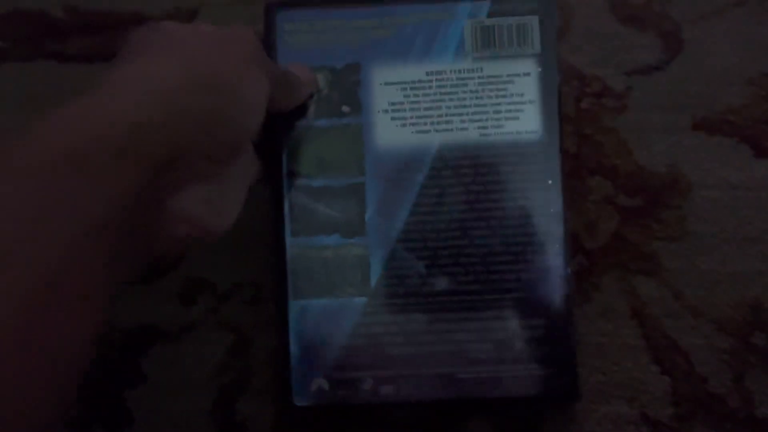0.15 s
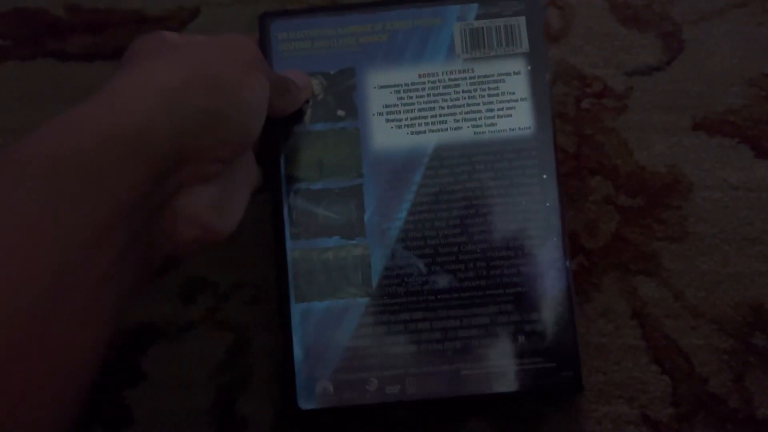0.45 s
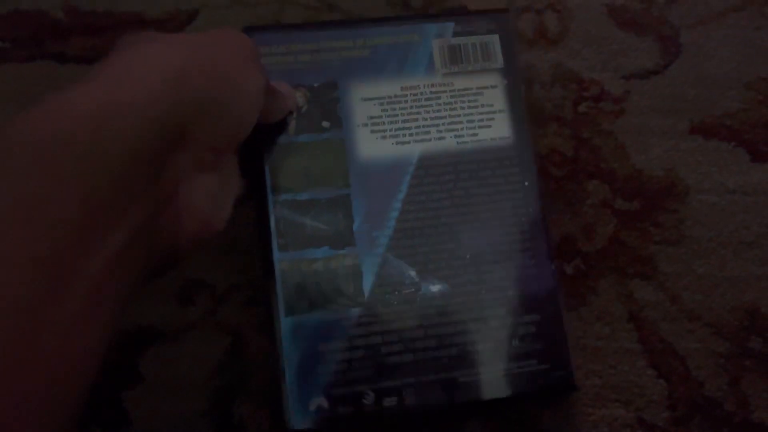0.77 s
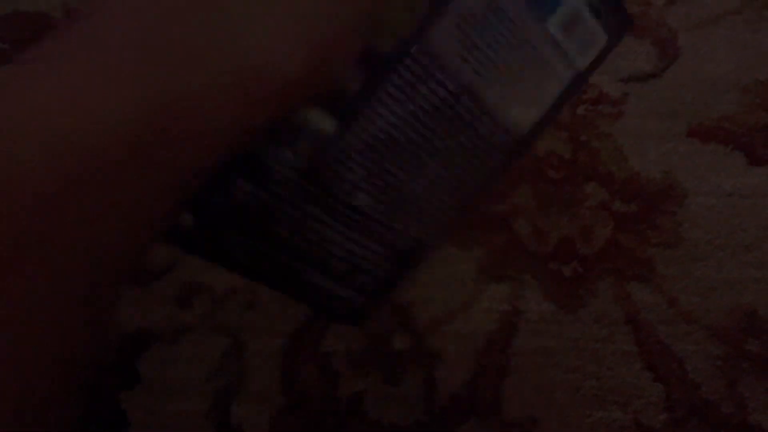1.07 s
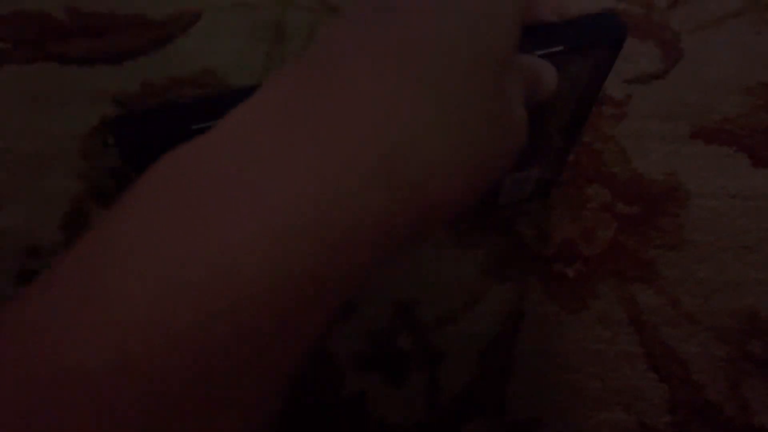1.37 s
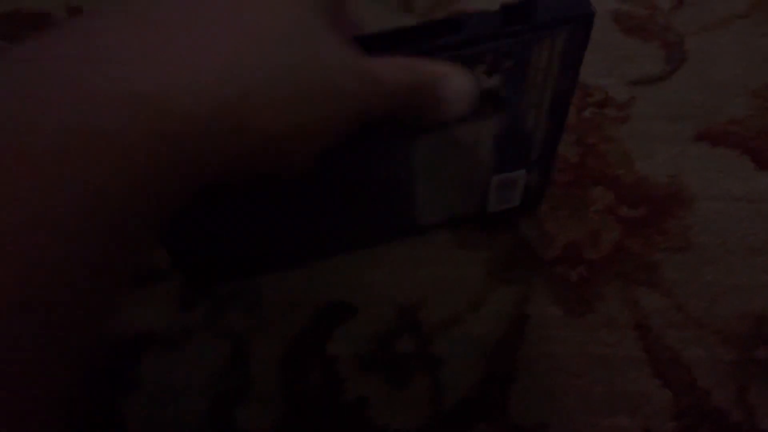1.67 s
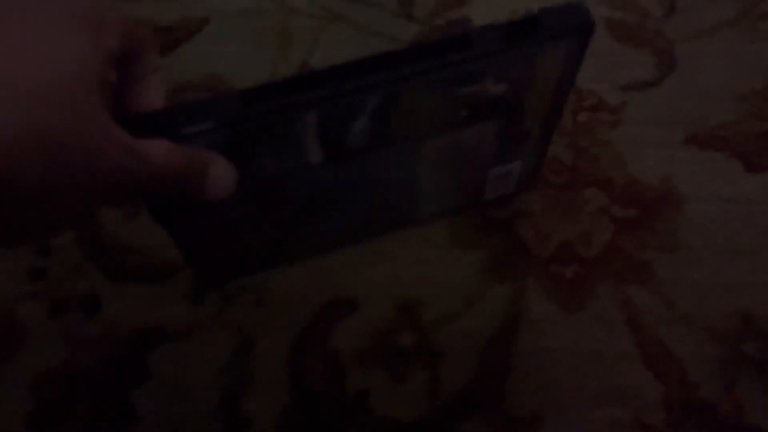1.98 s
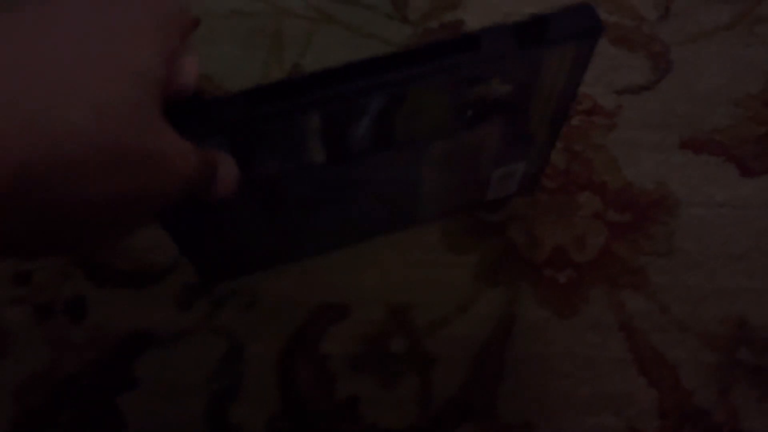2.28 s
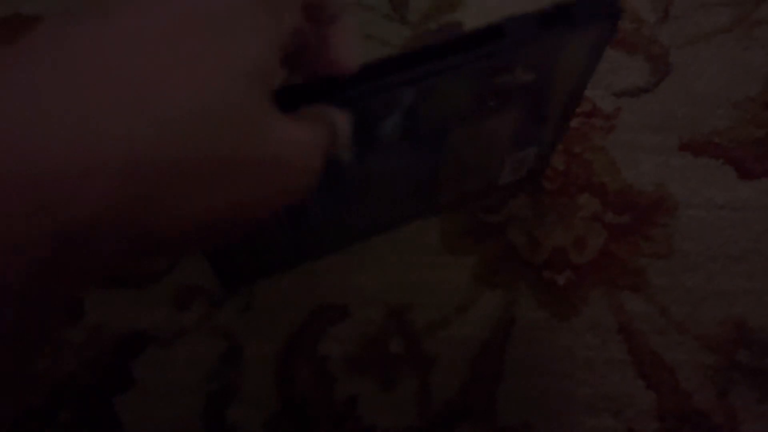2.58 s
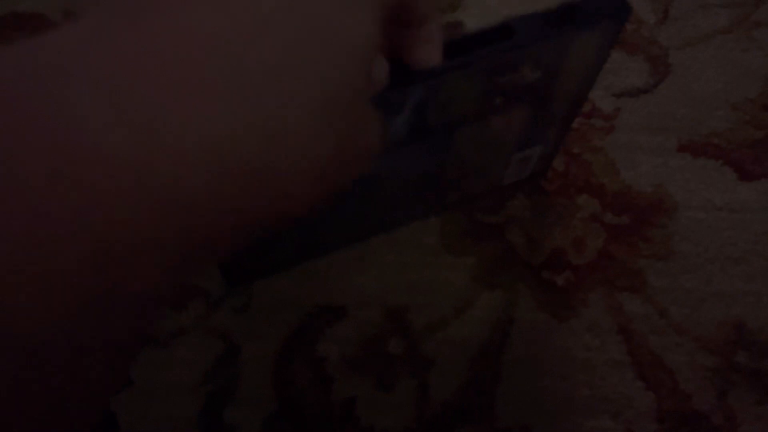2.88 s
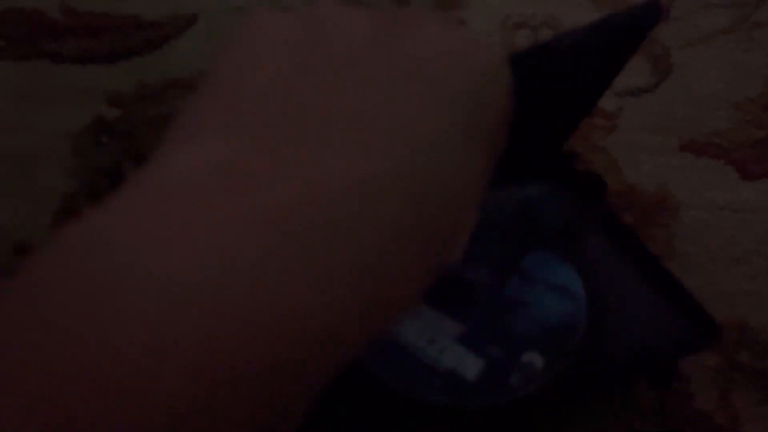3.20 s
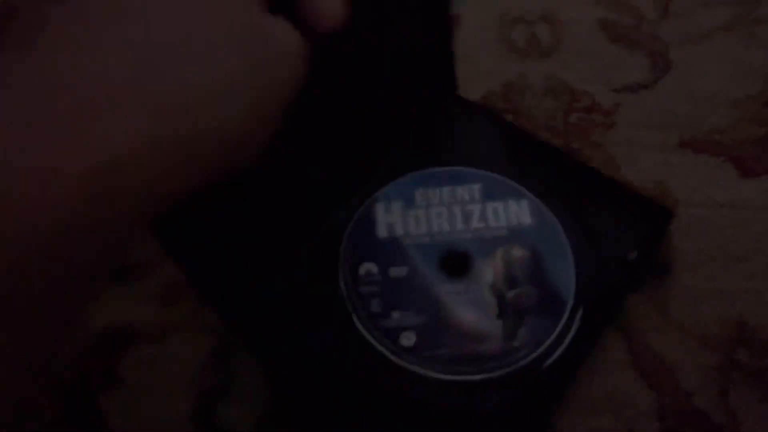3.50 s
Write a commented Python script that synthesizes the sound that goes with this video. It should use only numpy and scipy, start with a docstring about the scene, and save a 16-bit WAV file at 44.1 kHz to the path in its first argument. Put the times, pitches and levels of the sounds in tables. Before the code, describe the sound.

A hollow plastic disc case is turned in the hands with light ticks, then pried open in several bursts of creaks and sharp snaps. Soft knocks and finger rubs come between, close to the microphone in a quiet room.

```python
"""Prying open a disc case

A hollow plastic case is turned in the hands and pried open over a rug, close to a stereo microphone.
Bursts of tiny slips ring its body, shell and ribs: ticks, creaks, snaps and the crack of the latches.
Case and wrist knock, fingers rub the sleeve; a quiet room rumbles and rings on."""
import sys
import numpy as np
from scipy import signal
from scipy.fft import rfft, irfft
from scipy.io import wavfile
from scipy.ndimage import uniform_filter1d

SR = 44100
rng = np.random.default_rng(int(sys.argv[2]) if len(sys.argv) > 2 else 0)


def put_to_file(sound):
    """Save the sound as 16-bit audio at rate SR, in the file named by the first command-line argument."""
    columns = np.atleast_2d(sound).T  # one column per channel
    safe = np.clip(columns, -1, 1)
    whole_steps = np.round(safe * 32767)
    wavfile.write(sys.argv[1], SR, whole_steps.astype(np.int16))


N = 160965


def case_clicks():
    """Slips ring body, shell, ribs and a bright crack. Returns left, right and room feed."""
    # Each row: start in seconds, body level in dB, favoured body pitch in Hz, shell, rib and crack levels
    # in dB, left lag in ms, left over right in dB (limited below), slip length in ms,
    # then any pitches that ring out in Hz.
    clicks = [(0.108, -44, 300, -51, -55, -78, -0.0044, -4, 6),
              (0.1168, -41, 620, -46, -39.5, -63, -0.2, -4.5, 2.1, 4100),
              (0.1406, -47, 700.0, -50, -47, -63, -0.17, -1.5, 2.5, 4200),
              (0.3352, -91, 310.0, -84, -66.5, -66, 0.0, -4, 1.9),
              (0.8973, -68.5, 351, -80, -65, -87, -0.09, 8, 2.9),
              (0.992, -48, 930, -42.5, -45.5, -60, -0.18, -4, 5.9),
              (1.0255, -40.5, 398, -47, -53, -64, -0.23, -2, 1.76),
              (1.034, -43, 424, -52, -56, -80, 0.11, -11, 1.2),
              (1.1561, -80.5, 420.0, -55, -54.5, -75, -0.084, -5, 2.5),
              (1.2036, -37, 392, -46, -47.5, -58, -0.16, -4.5, 5.9),
              (1.233, -47.5, 520.0, -59, -59.5, -62, 0.007, -2.5, 5),
              (1.237, -34, 590, -47, -37, -51, 0.021, 6, 2.8),
              (1.2413, -29.5, 510.0, -37.5, -34.5, -56, -0.092, -7, 3.1),
              (1.247, -33.5, 630.0, -46, -38, -54, -0.31, 22, 7.6),
              (1.25, -26.5, 720, -32.5, -33, -47, 0.0056, -6, 1.5),
              (1.2518, -30, 760.0, -45, -30, -63, 0.13, -7, 4.5),
              (1.259, -43.5, 672, -40, -43.5, -55, 0.24, -16, 2.0),
              (1.412, -27, 820, -30, -34, -61, -0.15, -4, 0.88, 1850),
              (1.4159, -28, 260, -44, -37.5, -80, -0.15, 8, 4.9),
              (1.4222, -24.5, 565, -29, -18, -19, 0.1, -2, 2.2, 2700, 4500),
              (1.534, -44, 300.0, -44, -60.5, -63, 0.12, -13, 3),
              (1.588, -53, 320.0, -60.5, -61.5, -73, -0.17, 5, 2.0),
              (1.622, -48.5, 587, -58.5, -55.5, -65, -0.093, -4, 1.74),
              (1.629, -47, 382, -54.5, -48, -54, -0.13, -2, 11),
              (1.815, -42, 583, -41, -42, -58, -0.22, -3.5, 6),
              (1.885, -52, 440.0, -66, -58, -61, -0.21, -3, 1.8),
              (1.9377, -50.5, 493, -47, -51, -71, -0.16, -7.5, 0.88),
              (2.081, -56, 400.0, -63, -65, -86, -0.34, -7.5, 1.78),
              (2.159, -56, 439, -58.5, -66, -79, 0.062, -5, 2.0),
              (2.21, -50.5, 524, -45.5, -59, -78, -0.26, -1.5, 4.3),
              (2.232, -42, 330.0, -47, -54.5, -74.5, -0.18, -6.5, 0.91),
              (2.2465, -33, 260, -34, -19, -40, -0.08, -3, 3, 3150),
              (2.2492, -25, 820, -30, -23, -30, -0.13, -4.5, 0.69, 3150, 2300),
              (2.272, -36, 420, -34, -33, -52, -0.21, -6, 1.5, 1520, 3100),
              (2.2967, -31, 800, -28, -22.5, -18.5, 0.1, -1.5, 0.7, 2350, 4220),
              (2.308, -31.5, 290.0, -33, -27, -59, -0.18, -1, 1.6),
              (2.443, -46.5, 320.0, -57, -61.5, -71, -0.28, -13, 2.0),
              (2.513, -52, 390.0, -58, -55.5, -53.5, 0.24, -0.5, 1.3),
              (2.584, -42, 470.0, -62, -40, -71.5, -0.27, -6, 11),
              (2.593, -40.5, 700, -36.5, -41, -62, -0.18, -5, 2.6, 1800, 3250),
              (2.601, -37.5, 310.0, -52, -50.5, -53, -0.18, 10, 8.8),
              (2.61, -51, 440.0, -57, -44.5, -49.5, -0.31, -4, 9.4),
              (2.618, -40, 730, -40, -48.5, -62, -0.11, -2, 3, 2000),
              (2.682, -42, 350.0, -43.5, -46, -63, -0.19, -5.5, 1.96),
              (2.759, -40.5, 800, -46.5, -42, -65.5, 0.01, -9.5, 3, 4300),
              (2.8225, -51, 800, -62.5, -62.5, -90, 0.0, -5, 3.4),
              (2.834, -61.5, 610.0, -49.5, -52.5, -76, -0.2, -4, 4),
              (2.852, -47.5, 380.0, -53, -50, -53.5, -0.17, -5.5, 11.1),
              (2.917, -41.5, 610.0, -41, -38, -44, -0.16, -1, 11),
              (2.929, -34.5, 800, -41.5, -39, -46.5, 0.016, -3, 1.07, 3350, 4050),
              (2.946, -44, 432, -52.5, -41.5, -57, -0.25, 3, 11),
              (2.962, -33, 780, -33.5, -36, -63, -0.18, -11, 2.5, 2020, 3450),
              (3.091, -50, 600, -40, -38, -60, -0.1, -4, 7, 3200, 2250),
              (3.0985, -21, 730, -26, -17, -47, -0.19, -8, 0.9, 4500),
              (3.101, -30, 476, -28, -29, -34, -0.083, -4, 2),
              (3.1032, -19, 460, -19, -22, -31, -0.056, 0, 0.8, 1900, 3900),
              (3.156, -42, 410.0, -54, -53, -51.5, -0.5, -1, 3.8),
              (3.282, -45, 600, -30, -29, -55, 0.5, -2, 9, 2650, 4500),
              (3.29, -21, 580, -18, -12, -19, 0.75, -3.5, 1.1, 2650, 4550),
              (3.292, -26, 590, -26, -22, -27.5, 0.55, 1, 3.5, 3350),
              (3.303, -35, 610.0, -26, -21, -36, 0.49, -5, 5, 4550),
              (3.309, -30, 590, -27, -21, -35, 0.06, -1, 8, 3300),
              (3.501, -52, 280.0, -55, -60, -71, -0.13, -1, 1.7)]
    # Modes of the case. Each row: frequency in Hz, relative level in dB, T60 in seconds.
    body_modes = [(255, -2.5, 0.03), (360, -7, 0.025), (450, -2.5, 0.018), (590, -1.5, 0.016),
                  (720, -1.5, 0.016), (835, 1, 0.016), (1010, -8, 0.018)]
    shell_modes = [(1490, -2, 0.012), (1800, 1, 0.012), (2020, 1.5, 0.012), (2300, 1, 0.012),
                   (2660, 1, 0.01)]
    rib_modes = [(3150, 1, 0.008), (3400, -1, 0.006), (3950, 0, 0.006), (4250, 0, 0.005),
                 (4580, 0.5, 0.005), (5250, -2, 0.004), (6350, -7, 0.004)]
    crack_modes = [(7060, 6, 0.001), (9050, -3, 0.004), (10520, 3.5, 0.0023), (11650, 5, 0.003),
                   (13100, 6, 0.002), (14300, 4, 0.0025)]
    body_hz, crack_hz = np.transpose(body_modes)[0], np.transpose(crack_modes)[0]
    out = np.zeros((3, N))
    for (start_s, body_db, favoured_hz, shell_db, ribs_db, crack_db,
         lag_ms, pan_db, slip_ms, *ringing_hz) in clicks:
        slip = slip_burst(slip_ms / 1000)
        snap = slip_burst(0.4 * slip_ms / 1000)
        body = shift_levels(body_modes, -14 * abs(np.log2(body_hz / favoured_hz)))
        tilt_db_per_octave = 0.6 * np.clip(crack_db - ribs_db + 8, 0, 20)
        crack = shift_levels(crack_modes, tilt_db_per_octave * np.log2(crack_hz / crack_hz[0]))
        high = (ring_modes(boost_near(shell_modes, ringing_hz), slip, shell_db)
                + ring_modes(boost_near(rib_modes, ringing_hz), slip, ribs_db)
                + ring_modes(crack, snap, crack_db))
        high *= gain_of(np.clip(pan_db, -9, 6) * np.array([[0.5], [-0.5], [0]]))
        low = ring_modes(body, slip, body_db, listener_spread_db=0)
        for channel, lag_s in enumerate((lag_ms / 1000, 0, 0)):
            add(out[channel], start_s + lag_s, high[channel])
            # The broad body reaches both sides more nearly together.
            add(out[channel], start_s + 0.35 * lag_s, low[channel])
    return out


def slip_burst(length_s):
    """A rush of tiny slips that swells and dies, with a near-flat spectrum."""
    progress = np.arange(1536) / SR / length_s
    envelope = progress ** 1.2 * np.exp(-2.2 * progress)
    slips = rng.standard_normal(len(progress))
    for _ in range(4):  # soften peaks, then whiten
        spectrum = rfft(np.sign(slips) * np.sqrt(abs(slips)) * envelope)
        slips = irfft(spectrum / (abs(spectrum) + 1e-12)) / (envelope + 0.02 * envelope.max())
    return slips * envelope


def ring_modes(modes, slip, level_db, spot_spread_db=1.8, listener_spread_db=1.5):
    """A slip excites damped modes; strengths vary with the spot struck and over three listening points."""
    t = np.arange(2400) / SR
    hz, mode_db, t60_s = np.transpose(modes)[:, :, None]
    spot, detune, *listeners = rng.standard_normal((len(modes), 5)).T[:, :, None]
    polarity = (-1.) ** np.arange(len(modes))[:, None]
    decay = gain_of(mode_db + spot_spread_db * spot - 60 * t / t60_s)
    tones = polarity * decay * np.sin(2 * np.pi * hz * (1 + 0.012 * detune) * t)
    responses = [(tones * gain_of(listener_spread_db * listener)).sum(0) for listener in listeners]
    rings = [signal.fftconvolve(response, slip) for response in responses]
    return np.array([gain_of(level_db) * x / np.sqrt(np.sum(x[:1200] ** 2) / 150) for x in rings])


def shift_levels(modes, shift_db):
    hz, mode_db, t60_s = np.transpose(modes)
    return np.column_stack([hz, mode_db + shift_db, t60_s])


def boost_near(modes, pitches_hz, boost_db=11, width_octaves=0.08):
    """Modes near the given pitches stand out."""
    octaves = np.log2(np.transpose(modes)[0][:, None] / np.reshape(pitches_hz, (1, -1)))
    return shift_levels(modes, boost_db * np.exp(-(octaves / width_octaves) ** 2).sum(1))


def thuds(attack_s=0.0088):
    """Low knocks of case and wrist: damped sines with a soft onset, mono."""
    # Each row: start in seconds, level in dB, frequency in Hz, T60 in seconds.
    knocks = [(.115, -17, 54.6, 0.028), (1.233, -13.5, 106.5, 0.031), (1.417, -28, 113, 0.13),
              (1.468, -22, 80.2, 0.048), (2.933, -15.5, 55.7, 0.032), (3.102, -19.5, 56.4, 0.088),
              (3.106, -24, 95, .06), (3.301, -34, 121, 0.077), (3.296, -25, 67, 0.092)]
    out, t = np.zeros(N), np.arange(SR // 4) / SR
    for start_s, level_db, hz, t60_s in knocks:
        envelope = gain_of(level_db - 60 * t / t60_s) * np.minimum(t / attack_s, 1)
        add(out, start_s, envelope * np.sin(2 * np.pi * hz * t))
    return out


def finger_rub(grits_per_s=1500, grit_spread_db=3.0, left_lead_ms=0.18):
    """Fingers slide on the sleeve: dense grit roughens a hiss and a duller scrape."""
    # Each row: time in seconds, hiss level in dB, scrape level in dB.
    levels = [(0, -85, -73), (0.1, -86, -70), (0.16, -77, -57), (0.26, -92, -82), (0.45, -95, -88),
              (0.85, -98, -85), (0.91, -86, -70), (0.97, -83, -71), (1.04, -84, -63), (1.09, -96, -81),
              (1.14, -74, -63.5), (1.19, -74.5, -60.5), (1.3, -82, -63), (1.38, -86, -70),
              (1.47, -51, -44.5), (1.54, -65.5, -59), (1.64, -70, -62.5), (1.7, -89, -73), (1.74, -96, -77),
              (1.77, -71, -66), (1.83, -73.5, -70.5), (1.9, -74, -66), (2.0, -79, -67.5),
              (2.08, -88.5, -84), (2.15, -71, -69), (2.21, -89, -64.5), (2.38, -59.5, -49),
              (2.47, -70, -58), (2.54, -90, -74), (2.58, -68, -58.5), (2.66, -69, -61.5),
              (2.74, -85.5, -71), (2.81, -85, -71.5), (2.89, -72, -62), (3.0, -79, -95), (3.07, -81, -57.5),
              (3.2, -72, -67.5), (3.27, -69.5, -45.5), (3.42, -74, -55), (3.5, -64.5, -57),
              (3.57, -73, -66), (3.65, -71, -61)]
    # Friction spectra. Each row: frequency in Hz, relative level in dB.
    hiss_spectrum = [(4000, -20.5), (6500, -5.5), (9000, -2), (12000, 1.5), (14500, -3.5), (16000, -15)]
    scrape_spectrum = [(200, -12), (500, 2), (900, 1), (2500, -0.5), (4300, 5), (5500, -8.5), (8000, -29)]
    grit = gain_of(grit_spread_db * np.minimum(rng.exponential(1, N), 5))
    grit *= rng.random(N) < grits_per_s / SR
    roughness = 1 + 1.1 * unit_rms(uniform_filter1d(grit, 40))
    noise = rng.standard_normal((3, N))
    shared = np.array([noise[2], np.roll(noise[2], round(left_lead_ms * SR / 1000))])
    friction = (noise[:2] + 1.3 * shared) * roughness
    hiss = gain_of(over_time(levels)) * unit_rms(equalise(friction, hiss_spectrum))
    scrape = gain_of(over_time(levels, column=2)) * unit_rms(equalise(friction, scrape_spectrum))
    return hiss + scrape * gain_of([[-1.5], [1.5]])


def room_reverb(feed, tail_db=-8, early_db=-7, build_s=0.012):
    """Wall and ceiling echoes over a sparse tail whose bands die at their own rates."""
    # Each row: delay in seconds, level in dB before the room's colour.
    echoes = [(.0135, -23), (.016, -24), (.022, -19), (.027, -21)]
    # Each row: frequency in Hz, T60 in seconds.
    decay_times = [(100, 0.17), (300, 0.15), (700, 0.3), (1800, 0.3), (4800, 0.28), (12000, 0.29)]
    # Each row: frequency in Hz, left-right correlation of the tail.
    correlations = [(100, .9), (600, .92), (1200, .6), (3000, 0)]
    # Each row: frequency in Hz, gain in dB.
    room_colour = [(100, 4), (500, -4), (2000, -4.5), (4500, -6), (8000, -1), (14000, -14)]
    taps = np.zeros((2, SR))
    positions = np.arange(140, SR - 20, 20) + rng.integers(0, 20, (2, (SR - 141) // 20))
    np.put_along_axis(taps, positions, rng.choice([-1., 1.], positions.shape), 1)
    taps[:, :round(build_s * SR)] *= gain_of(early_db)  # thin until the first walls answer
    hz, t, spectra = signal.stft(taps, SR, nperseg=256)
    spectra = stereo_pair(*spectra, at_hz(correlations, hz)[:, None])
    spectra *= gain_of(-60 * t / at_hz(decay_times, hz)[:, None])
    response = signal.istft(spectra, SR, nperseg=256)[1][:, :SR]
    response *= gain_of(tail_db) / np.linalg.norm(response[0])
    for delay_s, level_db in echoes:
        response[[0, 1], round(delay_s * SR) + rng.integers(0, 8, 2)] += gain_of(level_db)
    return equalise(signal.fftconvolve(feed[None], response, axes=1)[:, :N], room_colour)


def room_tone(floor_db=-56, patch_spread_db=1.6):
    """Low lumpy rumble and faint hiss, in drifting patches."""
    # Each row: frequency in Hz, relative spectral density in dB.
    spectrum = [(15, -28.5), (25, -42), (59, 6), (157, -1.5), (270, -12.5), (335, -6), (503, -14),
                (714, -26.5), (1070, -30), (1160, -25.5), (1790, -30.5), (2350, -25.5), (2910, -35),
                (16000, -69)]
    # Each row: frequency in Hz, left-right correlation.
    correlations = [(60, 0.98), (180, 0.88), (550, 0.32), (1650, -0.07), (4970, 0.05), (15000, 0.4)]
    # Each row: time in seconds, level in dB; only the rise above the lowest counts.
    drift = [(0.0, -59.5), (0.15, -59), (0.68, -59.5), (1.09, -57.5), (1.44, -58.5), (1.81, -57),
             (2.75, -56), (3.65, -59)]
    frames, hz = N // 256 + 5, np.fft.rfftfreq(1024, 1 / SR)
    left_re, left_im, other_re, other_im, patches = rng.standard_normal((frames, 513, 5)).T
    patches = unit_rms(uniform_filter1d(uniform_filter1d(patches, 6, axis=0), 10, axis=1))
    spectra = stereo_pair(left_re + 1j * left_im, other_re + 1j * other_im, at_hz(correlations, hz)[:, None])
    spectra *= gain_of(at_hz(spectrum, hz)[:, None] + patch_spread_db * patches)
    noise = unit_rms(signal.istft(spectra, nperseg=1024, noverlap=768)[1][:, :N])
    drift_db = over_time(drift)
    return gain_of(floor_db + drift_db - drift_db.min()) * noise


def gain_of(db):
    return 10 ** (np.asarray(db) / 20)


def unit_rms(x):
    return x / np.sqrt(np.mean(x ** 2) + 1e-20)


def at_hz(points, hz):
    knots_hz, values = np.transpose(points)
    return np.interp(np.log(hz + 1), np.log(knots_hz + 1), values)


def over_time(points, column=1):
    columns = np.transpose(points)
    return np.interp(np.arange(N) / SR, columns[0], columns[column])


def add(mix, start_s, sound):
    part = mix[round(start_s * SR):][:len(sound)]
    part += sound[:len(part)]


def equalise(x, points):
    hz = np.fft.rfftfreq(x.shape[-1], 1 / SR)
    return irfft(rfft(x) * gain_of(at_hz(points, hz)), x.shape[-1])


def stereo_pair(left, other, correlation):
    return np.array([left, correlation * left + np.sqrt(1 - correlation ** 2) * other])


def scene():
    """The case and its reverb, dry finger rub and room tone."""
    case = case_clicks() + thuds()
    return case[:2] + room_reverb(case[2]) + finger_rub() + room_tone()


def record(dry, cutoff_hz=16800):
    """Microphone colour, then a steep low-pass."""
    # Each row: frequency in Hz, gain in dB.
    mic_response = [(20, -22), (45, 0), (15000, 0), (16500, -6)]
    lowpass = signal.firwin(511, cutoff_hz, window=("kaiser", 9), fs=SR)
    return signal.oaconvolve(equalise(dry, mic_response), lowpass[None], "same")


dry = scene()
out = record(dry)
put_to_file(out)
```